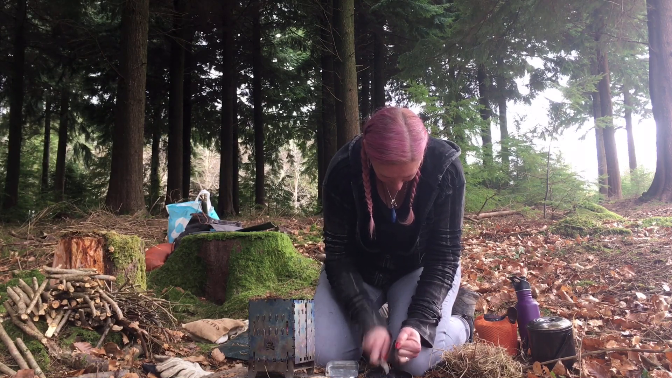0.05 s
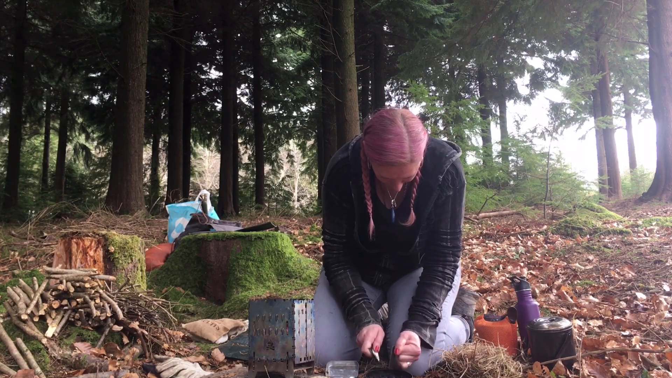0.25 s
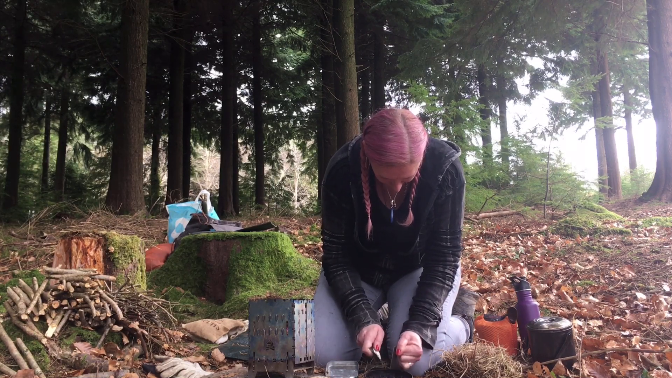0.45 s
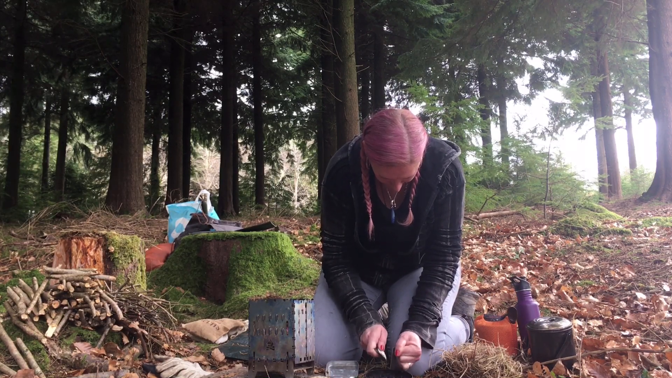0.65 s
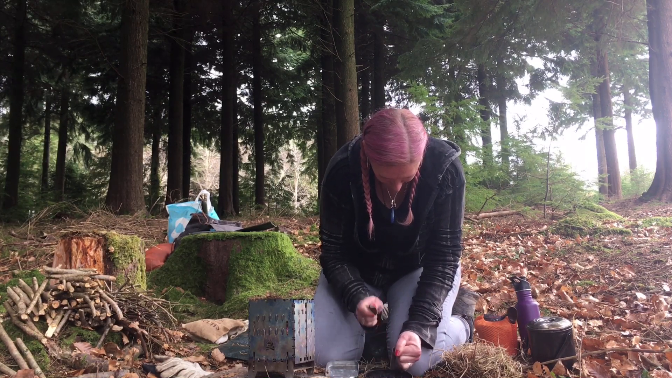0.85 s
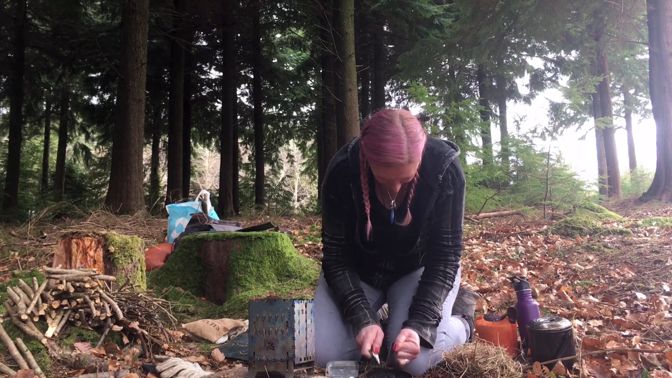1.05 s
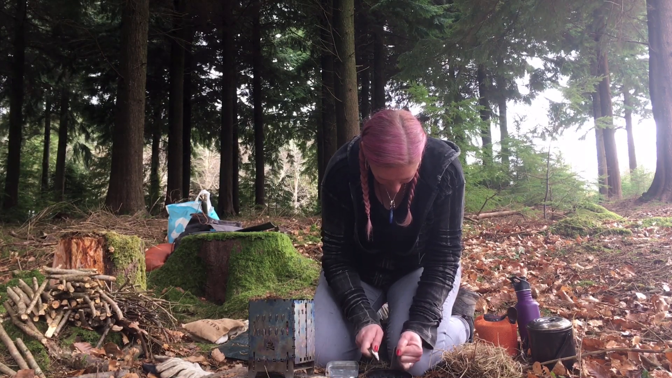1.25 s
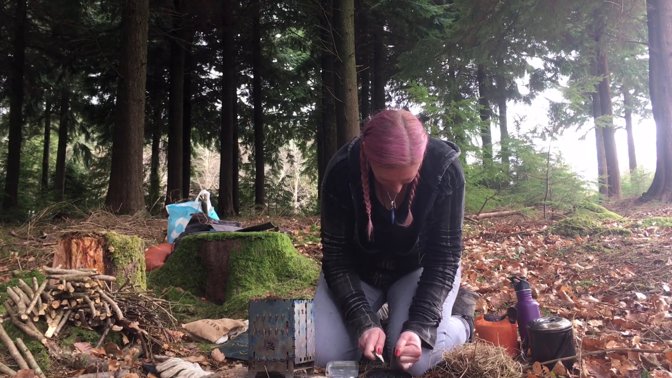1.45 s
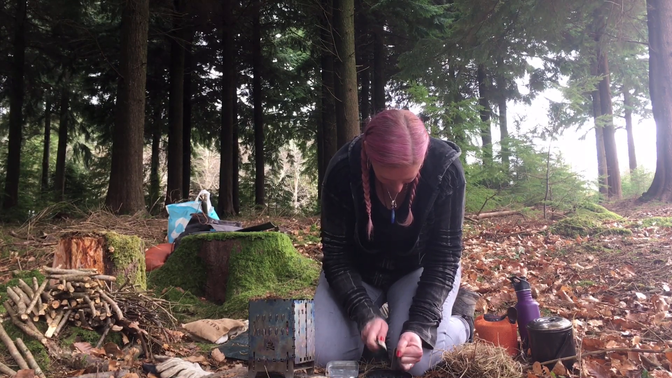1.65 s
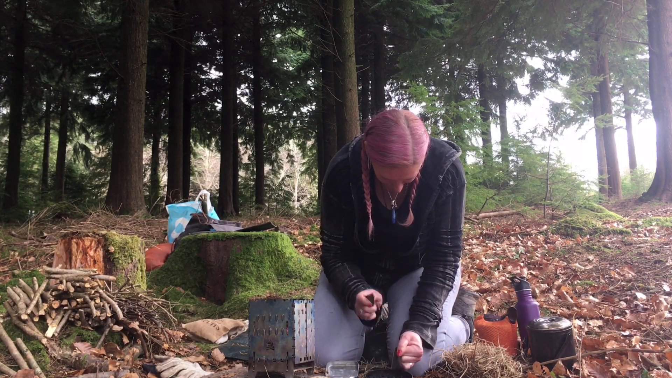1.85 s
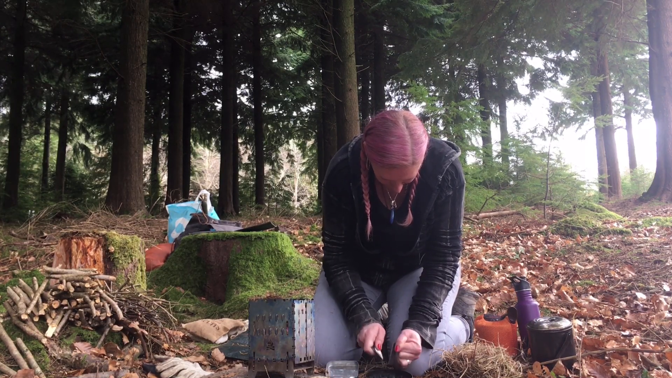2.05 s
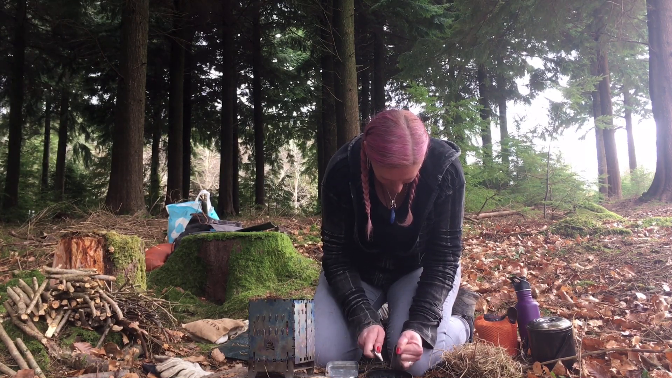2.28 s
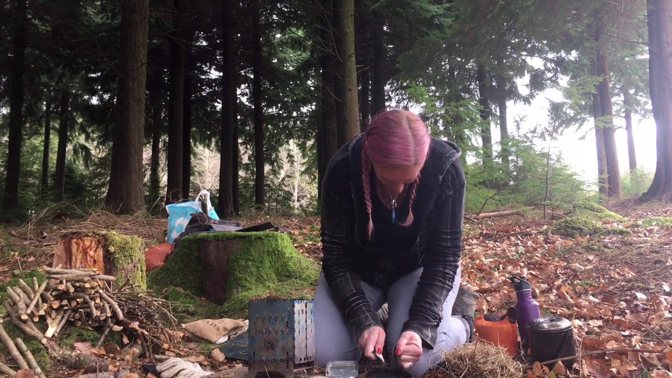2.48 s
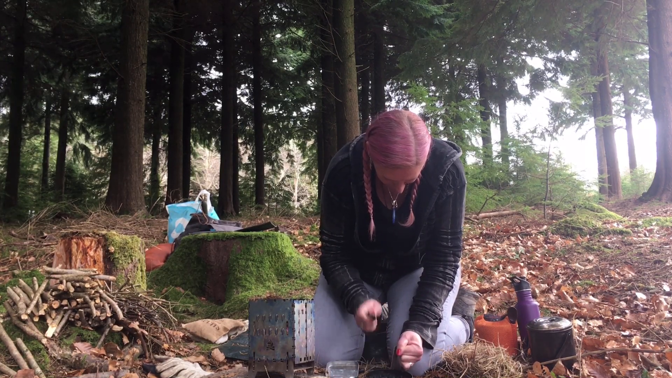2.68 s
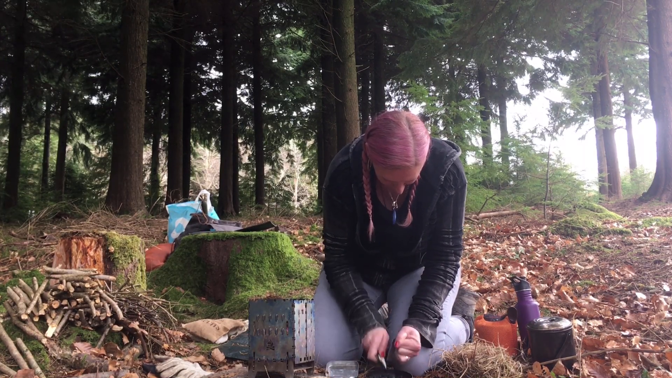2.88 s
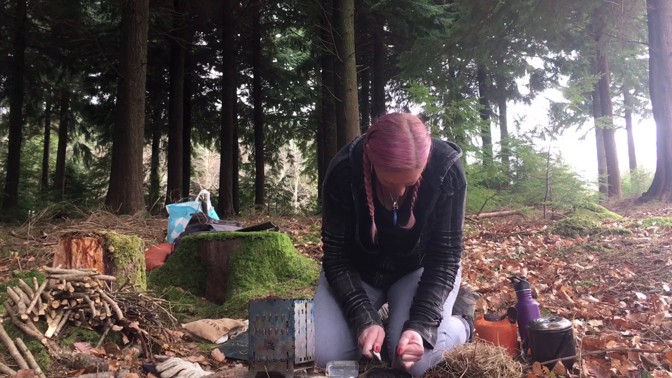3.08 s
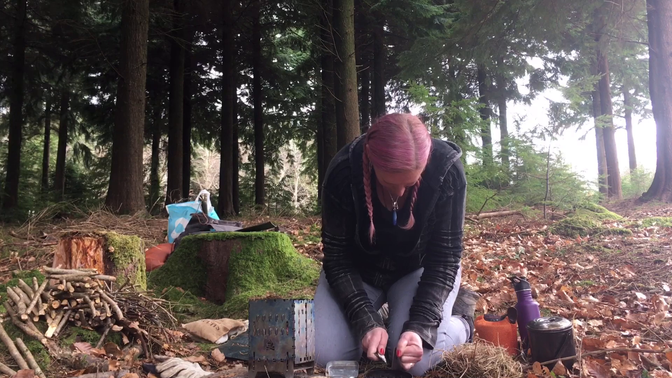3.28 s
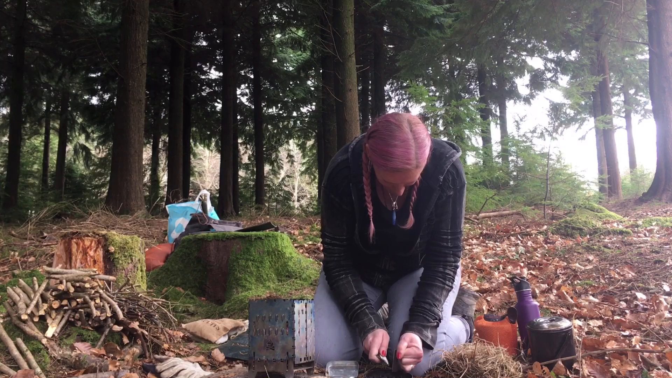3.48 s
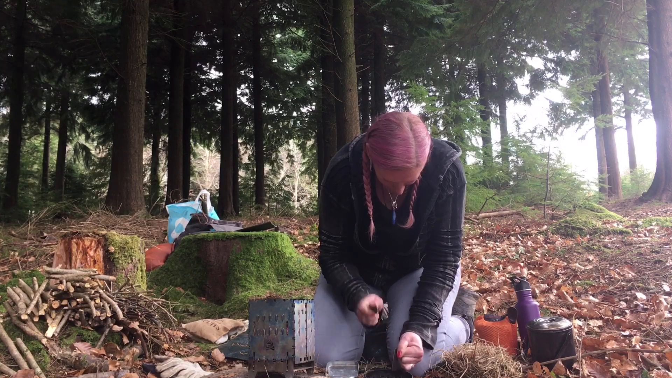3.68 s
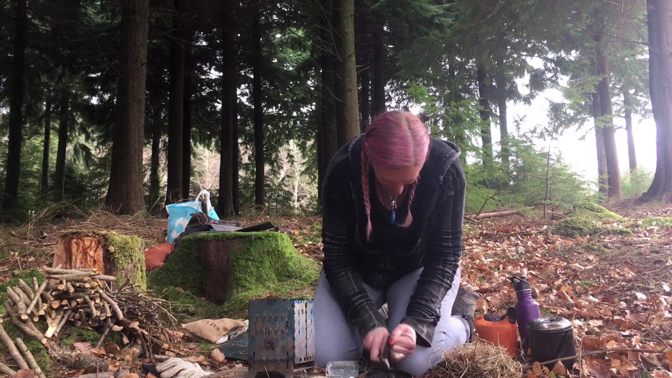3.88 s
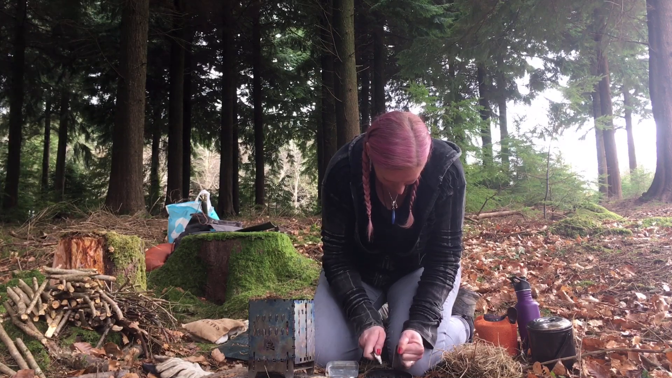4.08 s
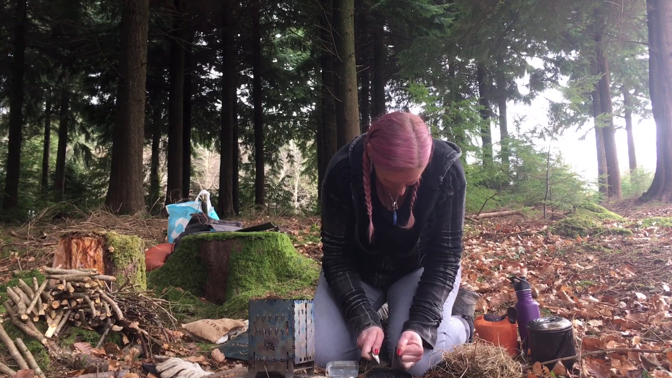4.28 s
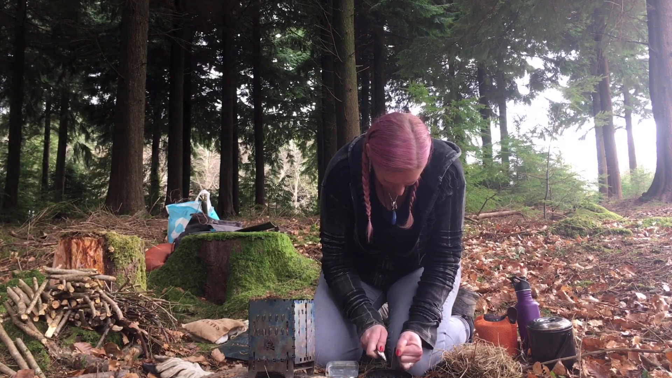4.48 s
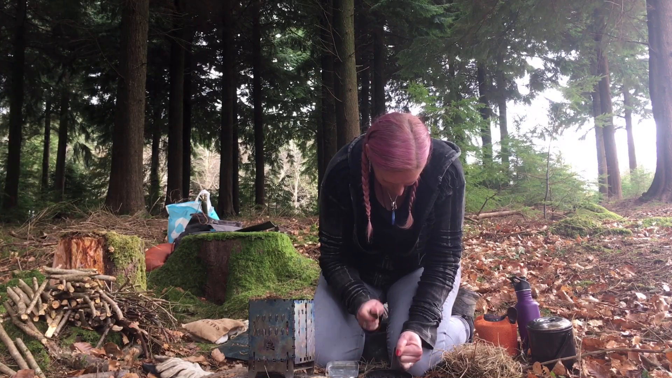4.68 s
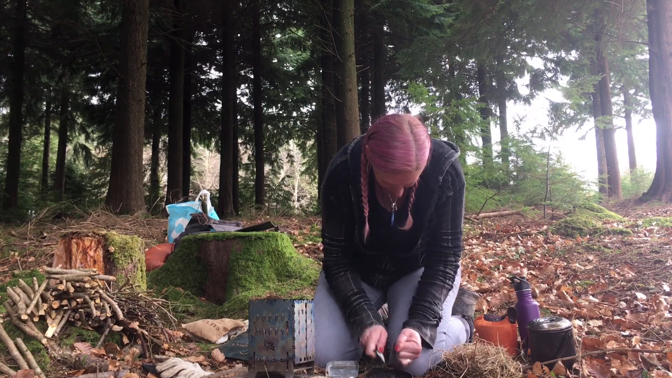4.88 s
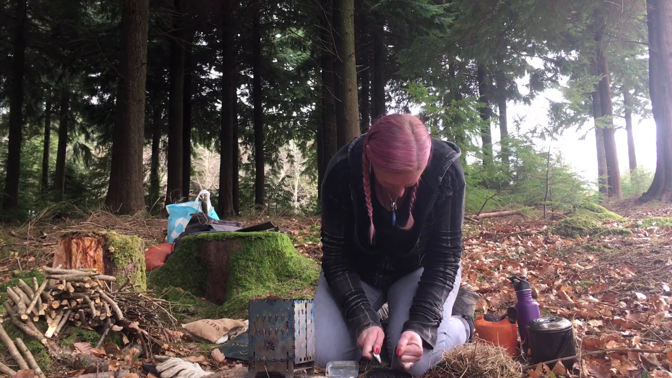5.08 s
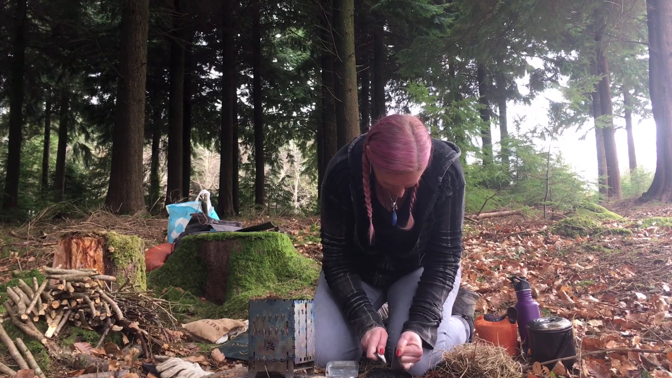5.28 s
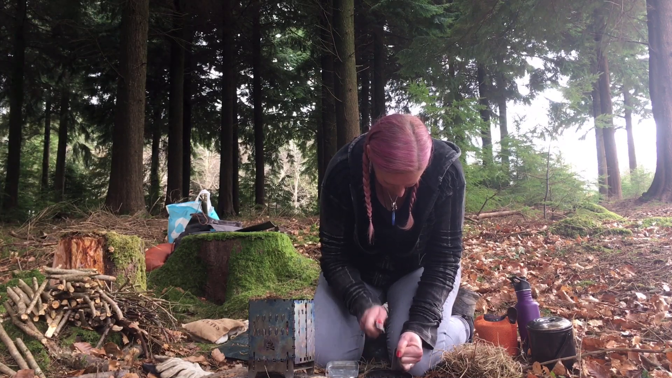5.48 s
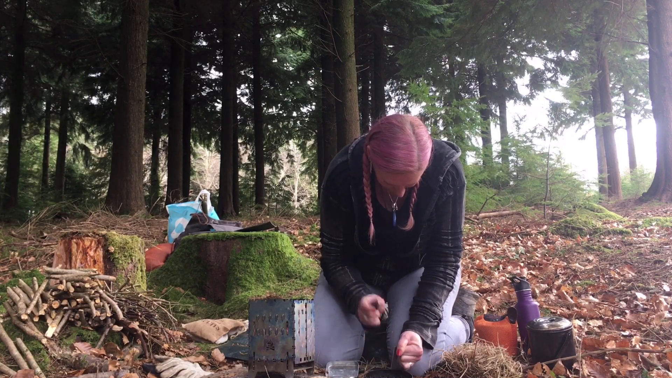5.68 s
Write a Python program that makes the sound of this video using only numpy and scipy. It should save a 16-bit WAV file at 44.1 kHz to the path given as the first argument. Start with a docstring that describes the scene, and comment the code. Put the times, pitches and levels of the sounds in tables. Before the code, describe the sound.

Six sharp, bright flint-on-steel strikes about a second apart, each a gritty bite with tinny ring, in a hushed, lightly breezy forest.

```python
"""Flint and steel in the woods

A flint is struck down a hand-held steel six times in a conifer wood, plus one much fainter scrape.
Each stroke is a hard bite and a few skips: noise bursts for cracking grit, short sine rings for the steel.
Trunks scatter the sound back as decaying noise and three echoes. Behind it are shaped noises for wind,
a far drone, leaves and recorder hiss, and gliding sine whistles for faint birds."""
import sys
import numpy as np
from scipy import signal
from scipy.fft import rfft, irfft
from scipy.io import wavfile
from scipy.ndimage import uniform_filter1d

SR = 44100
rng = np.random.default_rng(int(sys.argv[2]) if len(sys.argv) > 2 else 0)


def wav_record(signal):
    """Record a signal, one row per channel, as 16-bit PCM in the file named by sys.argv[1]."""
    frames = np.transpose(np.atleast_2d(signal))
    bounded = np.clip(frames, -1, 1)
    # unit amplitude maps onto the largest positive 16-bit level
    quanta = np.round(bounded * 32767).astype(np.int16)
    wavfile.write(sys.argv[1], SR, quanta)


N = 253134  # length of the scene in samples

# Far drone, before its slow wavering: (time [s], level [dB])
DRONE_LEVEL = [(0.0, -61), (1.13, -63.5), (2.0, -62), (2.19, -69), (2.93, -67.5), (3.21, -69.5),
               (3.93, -69), (5.74, -71)]
# Tone colour of the drone: (frequency [Hz], relative level [dB per Hz])
DRONE_COLOUR = [(120, -31.5), (200, -2.5), (445, -4), (555, -2), (992, -1), (1090, -1.5), (1340, -5.5),
                (1650, -7), (1940, -14), (2130, -12.5), (3200, -26), (4160, -58.5), (7040, -120)]
# Tone colour of moving air in the tree crowns: (frequency [Hz], relative level [dB per Hz])
AIR_COLOUR = [(60, -2.5), (150, 3), (300, -2.5), (600, -9), (1200, -17.5), (2500, -26)]
# Tone colour of the recorder's hiss: (frequency [Hz], relative level [dB per Hz])
HISS_COLOUR = [(1180, -34), (2000, 2), (2400, -1), (2570, 1.5), (3270, 1), (4830, -6), (5840, 0),
               (7710, -8), (9650, -1.5), (10400, -9), (11300, -2), (15100, 1), (15800, -3.5)]
# Faint hums in the drone: (start [s], end [s], frequency [Hz], level [dB])
HUMS = [(.12, .7, 1130, -74), (.75, 0.9, 1701, -73), (1.3, 1.697, 1647, -74), (1.65, 1.921, 1076, -67),
        (3.5, 3.748, 1527, -77), (4.0, 4.609, 1193, -77.5)]
# Breeze between the buffets, before its flutter: (time [s], level [dB])
BREEZE = [(0, -57), (.3, -56.5), (.7, -62.5), (1.2, -62.5), (1.6, -63.5), (1.85, -48.5), (2.07, -63.5),
          (2.2, -56.5), (2.55, -61), (2.8, -51), (3.05, -62), (3.5, -60.5), (3.75, -52), (4.0, -62),
          (4.9, -63), (5.25, -63.5), (5.5, -54.5), (5.74, -60)]
# Single thumps of air on the microphone: (time [s], peak level [dB], length [s])
BUFFETS = [(0.344, -48.5, 0.042), (0.927, -49.5, .06), (1.03, -54.5, 0.055), (1.68, -67, 0.057),
           (2.639, -52, 0.043), (2.923, -53, 0.072), (3.157, -44.5, 0.087), (3.28, -38.5, 0.051),
           (3.371, -44.5, 0.037), (3.936, -47.5, 0.04), (4.104, -59, 0.054), (4.198, -57, .04),
           (4.283, -57, 0.042), (4.89, -59, 0.031)]
# Far birds, before roughening and blur: (start [s], end [s], start pitch [Hz], end pitch [Hz], level [dB])
BIRDS = [(3.468, 3.52, 5340, 5360, -85), (3.55, 3.567, 3950, 4404, -77.5), (3.561, 3.625, 4500, 4430, -76),
         (3.70, 3.846, 6040, 5790, -83.5), (4.451, 4.475, 3650, 3930, -80), (4.47, 4.517, 3250, 4750, -77),
         (4.578, 4.622, 4290, 4360, -78), (4.676, 4.7, 4210, 4020, -72.5), (4.713, 4.75, 3230, 3350, -82),
         (4.813, 4.84, 3610, 3720, -83)]
# Dry leaves crushed under the knees: (time [s], level [dB], centre [Hz], length [ms])
LEAVES = [(4.255, -53, 11930, 1.8), (4.578, -61, 5470, 4), (5.062, -52, 3500, 5.6), (5.106, -55, 9080, 3),
          (5.112, -53, 9020, 7.1), (5.121, -54, 9000, 4), (5.127, -57.5, 6200, 3), (5.133, -58, 10000, 3.7),
          (5.315, -62, 6000, 6)]
# Dense scatter of the wood: (band [Hz], level [dB], time to fall 60 dB [s])
WOOD = [(1200, -76, 0.33), (2380, -75.5, 0.79), (3420, -74.5, 0.53), (4500, -69, 0.64), (6100, -64.5, 0.52),
        (8300, -61, 0.44), (10900, -56, 0.12), (12910, -61.5, 0.35), (15000, -65.5, 0.32)]
# Trunks that answer clearly: (delay [s], level [dB])
TRUNKS = [(.056, -38), (0.125, -44), (0.231, -48)]
# Clicks and faint ticks of flint on steel:
# (time [s], crack level [dB], high ring level [dB], low ring level [dB])
CLICKS = [(0.1045, -4.5, -4, -22), (0.1058, -14, -10.5, -24.5), (0.1085, -22, -16.5, -26),
          (0.1165, -11.5, -24.5, -27), (0.1207, -16.5, -12.5, -40), (0.1268, -21.5, -4.5, -29.5),
          (1.0288, -5, -9.5, -20), (1.031, -11.5, -12.5, -19), (1.0375, -23, -26.5, -43),
          (1.0428, -12, -15.5, -31), (1.0465, -20, -12, -28.5), (1.053, -29.5, -33.5, -30.5),
          (1.058, -35, -35, -47.5), (1.0628, -26.5, -23.5, -24.5), (1.0645, -25.5, -8.5, -28.5),
          (2.003, -9, -16, -25), (2.010, -24, -37, -28), (2.0137, -24, -27, -23.5),
          (2.0159, -10.5, -19, -34), (2.0270, -23, -32, -32), (2.0298, -20.5, -16, -32.5),
          (2.033, -29, -27, -36), (2.8462, -54, -52.5, -65.5), (2.8694, -6.5, -4, -16),
          (2.8712, -9, -14.5, -24), (2.8797, -14.5, -14, -38), (2.8855, -16, -23, -28.5),
          (2.8885, -27, -23.5, -17.5), (2.8918, -27, -19.5, -24.5), (3.8448, -57, -55, -64.5),
          (3.8678, -3.5, -11.5, -17.5), (3.8689, -8, -1.5, -26), (3.8784, -17.5, -22, -36),
          (3.8818, -18.5, -13, -29.5), (3.8877, -24.5, -16, -16.5), (3.9963, -37.5, -38, -43),
          (4.0079, -37.5, -29, -55), (4.014, -55, -39, -63), (4.0238, -36, -47, -44),
          (4.030, -62, -33.5, -36.5), (4.8441, -5.5, -9, -15.5), (4.846, -11, -12.5, -28),
          (4.853, -21.5, -27, -32), (4.8548, -14.5, -21.5, -32), (4.859, -22, -27.5, -35),
          (4.8664, -22.5, 0, -40)]
# Strokes: (start [s], end [s], grinding level before easing [dB],
#           knock of the stone against the crack [dB], usual high ring pitch [Hz])
STROKES = [(0.1, 0.114, -29.5, -15.5, 11200), (1.027, 1.063, -32, -15.5, 11200),
           (1.999, 2.039, -32.5, -21.5, 11250), (2.8685, 2.893, -31.5, -15, 11300),
           (3.8567, 3.889, -32.5, -18.5, 11200), (3.9966, 4.045, -51, -8.5, 11570),
           (4.8397, 4.87, -33.5, -20, 11160)]
# Tone colour of the cracking grit: (frequency [Hz], relative level [dB per Hz])
GRIT_COLOUR = [(180, -66.5), (300, -40), (1000, -41), (1650, -18.5), (2780, -8.5), (3760, -0.5), (6750, -7),
               (7980, -6), (9910, -6.5), (11100, 0.5), (13400, -9.5), (15600, -16.5), (16400, -26.5)]
# Lesser rings, heard with every crack; each blow varies pitch and level:
# (frequency [Hz], level against the crack [dB], time to fall 60 dB [s])
LESSER_RINGS = [(2720, -19.5, 0.021), (4020, -14, 0.026), (4390, -16.5, 0.0027), (5330, -14.5, 0.018),
                (6440, -14, 0.016), (8920, -14, 0.018), (9500, -16, 0.0078), (12960, -6.5, 0.0091)]
# Dull rings of the stone in the fist; each blow varies pitch and level:
# (frequency [Hz], level against the knock [dB], time to fall 60 dB [s])
STONE_RINGS = [(700, -19.5, .008), (980, -14, 0.0058), (1610, -19, 0.0073), (1898, -3.5, 0.016),
               (2180, -6, 0.032)]

AIR_DB, HISS_DB = -64, -71
FLUTTER_DB, FLUTTER_PER_S = 1, 14  # wavering of the breeze
CRACK_MS = 1.7
HIGH_MS, HIGH_SPREAD = 6.5, 0.0099  # length of the high ring, and its pitch spread as a fraction
LOW_HZ, LOW_T60_S = 3605, 0.021  # low ring: pitch, and time to fall 60 dB
KNOCK_LOSS_DB_PER_MS = 0.15  # the stone knocks less as the stroke glances off
SING_DB, SING_WIDTH_HZ = 1.5, 500  # grinding keeps the high ring singing
GRIND_EASE = 2  # how strongly pressure eases along a stroke
TOP_HZ = 15950  # where the recorder cuts the treble


def undb(db):
    """Turn a level in dB into a gain."""
    return 10 ** (np.asarray(db) / 20)


def unit(x):
    """Scale a sound to an average (rms) level of 1."""
    return x / np.sqrt(np.mean(x ** 2))


def curve(table):
    """Draw straight lines through a (time, value) table, giving a value at every sample."""
    return np.interp(np.arange(N) / SR, *np.transpose(table))


def coloured(table, size):
    """Make noise of rms 1 whose spectrum follows a (frequency, level) table."""
    hz, db = np.transpose(table)
    grid = np.maximum(np.fft.rfftfreq(size, 1 / SR), 1)
    gain = undb(np.interp(np.log(grid), np.log(hz), db))
    spectrum = rfft(rng.standard_normal(size))
    return unit(irfft(spectrum * gain, size))


def band(x, lo_hz, hi_hz):
    """Keep only the frequencies between two edges."""
    edges = [lo_hz, min(hi_hz, .45 * SR)]
    return signal.sosfilt(signal.butter(2, edges, "band", fs=SR, output="sos"), x)


def fade(t, t60):
    """Die away smoothly, by 60 dB in t60 seconds."""
    return np.exp(-np.log(1000) * t / t60)


def walk(rate):
    """Wander randomly with a spread of 1: about rate new values a second, smoothed twice."""
    k = int(SR / rate)
    steps = np.repeat(rng.standard_normal(N // k + 1), k)
    return unit(uniform_filter1d(uniform_filter1d(steps, k), k)[:N])


def add(out, s, sound):
    """Mix a sound into out, starting at s seconds."""
    i = int(s * SR)
    out[i:i + len(sound)] += sound[:N - i]


def burst(noise, ms):
    """Shape noise into a crack: it rises in a few samples and is over soon after ms."""
    t = np.arange(len(noise)) / SR
    shape = (1 - np.exp(-t / 0.00035)) * np.exp(-(t / (ms / 1000)) ** 1.1)
    crack = noise * shape
    # give it the energy of a sine of height 1 under the same shape
    return crack * np.sqrt(np.sum(shape ** 2) / np.sum(crack ** 2) / 2)


def background():
    """A changing far drone, moving air in the crowns and steady hiss, each made of coloured noise."""
    drone = coloured(DRONE_COLOUR, size=N) * undb(curve(DRONE_LEVEL) + 0.97 * walk(6.1))
    air = coloured(AIR_COLOUR, size=N) * undb(AIR_DB + 0.71 * walk(3.6))
    hiss = coloured(HISS_COLOUR, size=N) * undb(HISS_DB)
    return drone + air + hiss


def tones():
    """Narrow bands of noise, heard as wavering hums that come and go in the drone."""
    out = np.zeros(N)
    for start, end, hz, db in HUMS:
        count = int((end - start) * SR)
        hum = unit(band(rng.standard_normal(count), hz - 18, hz + 18))
        add(out, start, undb(db) * hum * signal.windows.tukey(count, .4))
    return out


def wind():
    """Eddies buffet the microphone as low rumble; stronger gusts reach higher in pitch."""
    t = np.arange(N) / SR
    thumps = sum(undb(db) * np.exp(-(2 * (t - s) / length) ** 2) for s, db, length in BUFFETS)
    breeze = undb(curve(BREEZE) + FLUTTER_DB * walk(FLUTTER_PER_S))
    gust_db = 20 * np.log10(breeze + thumps)
    low = unit(band(band(rng.standard_normal(N), 36, 92), 34, 92))
    upper = unit(band(band(rng.standard_normal(N), 96, 170), 88, 200)) * undb(2 * walk(25))
    upper_gain = undb(-18.5 + 1.4 * (gust_db + 49.5))  # grows with the gust
    return undb(gust_db) * (low + upper_gain * upper)


def birds():
    """Faint gliding sine whistles, roughened by moving air and blurred by the trees."""
    out = np.zeros(N)
    for start, end, from_hz, to_hz, db in BIRDS:
        count = int((end - start) * SR)
        phase = 2 * np.pi * np.cumsum(np.linspace(from_hz, to_hz, count)) / SR
        whistle = np.sqrt(2) * np.sin(phase) * signal.windows.tukey(count, .6)
        add(out, start, undb(db) * whistle)
    out *= undb(4 * walk(240))  # moving air roughens them
    t = np.arange(SR // 3) / SR
    blur = rng.standard_normal(len(t)) * fade(t, 0.54)
    return out + undb(3) * signal.fftconvolve(out, blur / np.linalg.norm(blur))[:N]


def leaves():
    """Small crushes of dry leaves, each a cluster of noise grains of uneven strength."""
    out = np.zeros(N)
    for s, db, hz, ms in LEAVES:
        grains = rng.standard_normal(1024) * undb(4.5 * rng.standard_normal(1024))
        add(out, s, undb(db) * burst(band(grains, hz / 2.4, hz * 2.65), ms))
    return out


def wood(grit, high, low):
    """Many trunks return a dense noisy tail, band by band, and three trunks answer clearly."""
    t = np.arange(SR) / SR
    swell = 1 - np.exp(-t / 0.0043)  # the nearest trunks are metres away
    tail = np.zeros(SR)
    for hz, db, t60 in WOOD:
        scatter = unit(band(rng.standard_normal(SR), hz / 1.6, hz * 1.18))
        tail += undb(db) * fade(t, t60) * swell * scatter
    echoes = np.zeros(SR)
    for delay, db in TRUNKS:
        echoes[int(delay * SR)] = undb(db)
    # a crack has another colour in every direction: summed over the trees only its loudness survives
    around = grit * rng.choice([-1, 1], N)
    rings = undb(-4) * high + undb(-11) * low
    scattered = signal.fftconvolve(around + rings, tail)
    answers = signal.fftconvolve(band(around, 1798, 17000), echoes)
    return (scattered + answers)[:N]


def ring(modes, t, apart):
    """Ring a set of modes at a new spot each blow; apart [radians] sets the spread of starting phases."""
    hz, db, t60 = np.array(modes).T[:, :, None]
    pitch, level, turn = rng.standard_normal((3, *db.shape))
    swing = 2 * np.pi * hz * (1 + 0.02 * pitch) * t + apart * turn
    return np.sum(undb(db + 2.0 * level) * fade(t, t60) * np.sin(swing), axis=0)


def flint():
    """Flint bites steel: grit cracks and grinds as noise, and the steel rings high and low."""
    grit, high, low = np.zeros((3, N))
    t = np.arange(2048) / SR
    # the fingers rub the high ring out at a steady rate, so it ends instead of fading
    gripped = (1 - np.exp(-t / 0.000089)) * np.clip(1 - 1000 * t / HIGH_MS, 0, 1) ** 2.9
    low_shape = (1 - np.exp(-t / .0009)) * fade(t, LOW_T60_S)
    for s, crack_db, high_db, low_db in CLICKS:
        turn = 2 * np.pi * rng.random(2)
        start, _, _, body_db, steel_hz = min(STROKES, key=lambda stroke: abs(s - stroke[0]))
        high_hz = steel_hz * (1 + HIGH_SPREAD * rng.standard_normal())  # the grip shifts
        knock_db = crack_db + body_db - KNOCK_LOSS_DB_PER_MS * 1000 * max(s - start, 0)
        crack = burst(band(coloured(GRIT_COLOUR, size=len(t)), 2400, 22000), CRACK_MS)
        crack += ring(LESSER_RINGS, t, 2.4)
        knock = ring(STONE_RINGS, t, .7)
        add(grit, s, undb(crack_db) * crack + undb(knock_db) * knock)
        add(high, s, undb(high_db) * gripped * np.sin(2 * np.pi * high_hz * t + turn[0]))
        add(low, s, undb(low_db) * low_shape * np.sin(2 * np.pi * LOW_HZ * t + turn[1]))
    grind = coloured(GRIT_COLOUR, size=N) * undb(3.9 * walk(600))
    click_times = np.array(CLICKS)[:, 0]
    for start, end, grind_db, _, steel_hz in STROKES:
        # grinding starts at the click nearest the start of the stroke
        bite = min(click_times, key=lambda s: abs(s - start))
        i, j = int(bite * SR), int(end * SR)
        ease = np.exp(-GRIND_EASE * np.arange(j - i) / (j - i))
        press = undb(grind_db) * signal.windows.tukey(j - i, .3) * ease
        grit[i:j] += press * grind[i:j]
        singing = unit(band(grind[i:j], steel_hz - SING_WIDTH_HZ / 2, steel_hz + SING_WIDTH_HZ / 2))
        high[i:j] += press * undb(SING_DB) * singing
    return band(grit, 700, 19000), band(high, 7000, 18000), low  # small things radiate no bass


def scene():
    """Add up all sources at the one microphone."""
    strikes = flint()
    surroundings = background() + tones() + wind() + birds() + leaves()
    return (surroundings + wood(*strikes) + sum(strikes))[None]


def record(dry):
    """The recorder clips at full scale, then cuts the top of the treble."""
    top_cut = signal.ellip(8, .3, 45, TOP_HZ, fs=SR, output="sos")
    return signal.sosfilt(top_cut, np.clip(dry, -1, 1))


dry = scene()
out = record(dry)
wav_record(out)
```